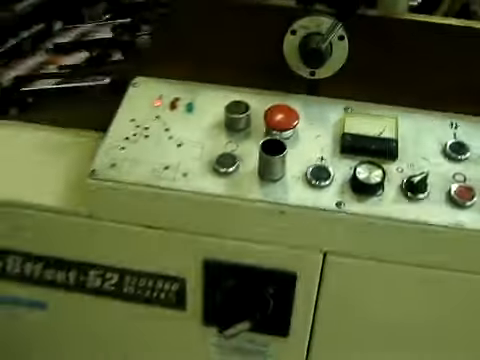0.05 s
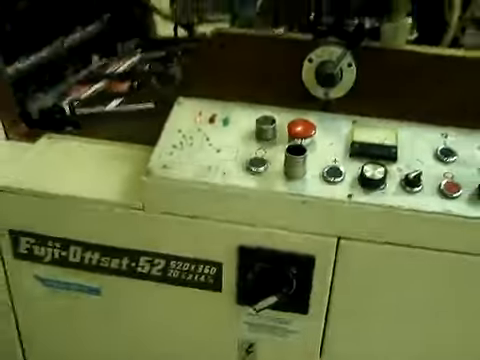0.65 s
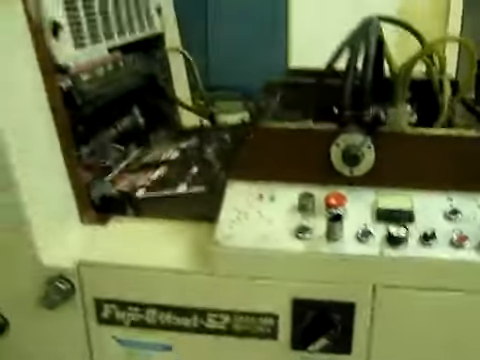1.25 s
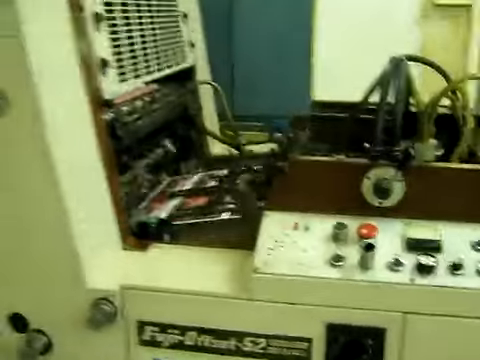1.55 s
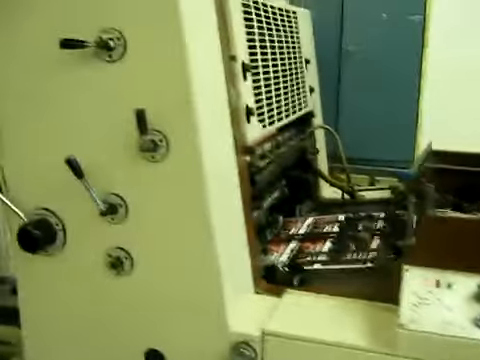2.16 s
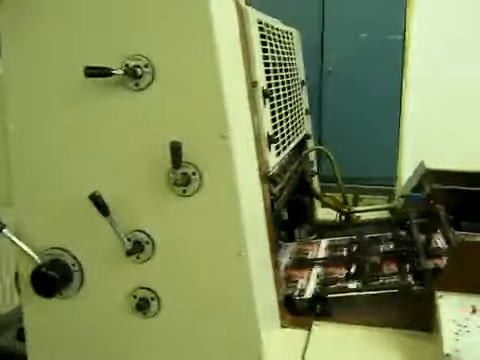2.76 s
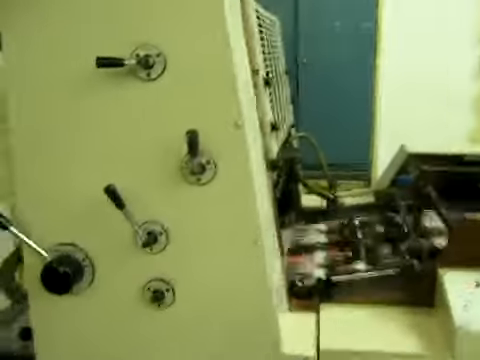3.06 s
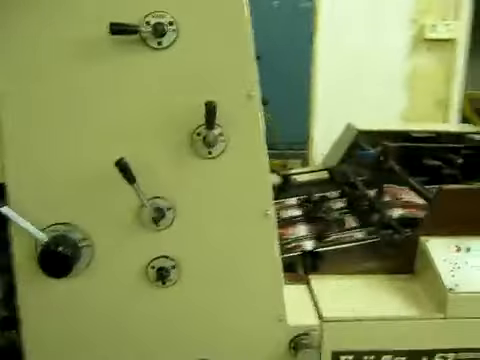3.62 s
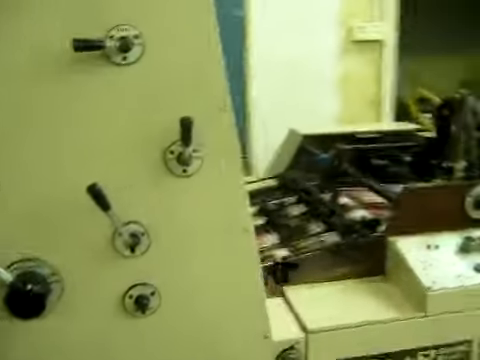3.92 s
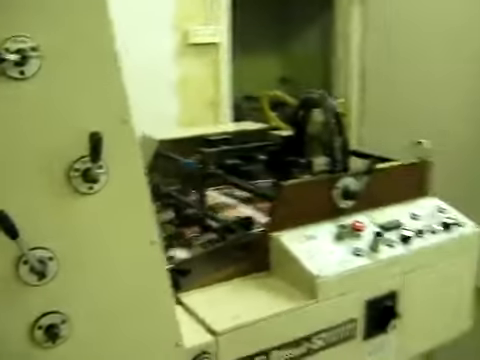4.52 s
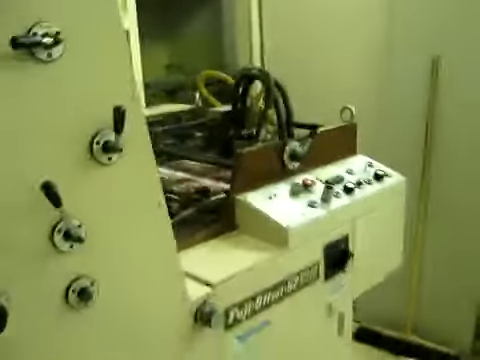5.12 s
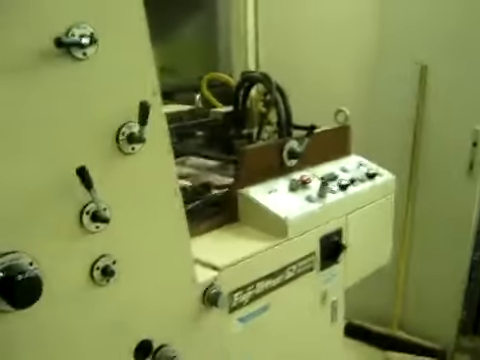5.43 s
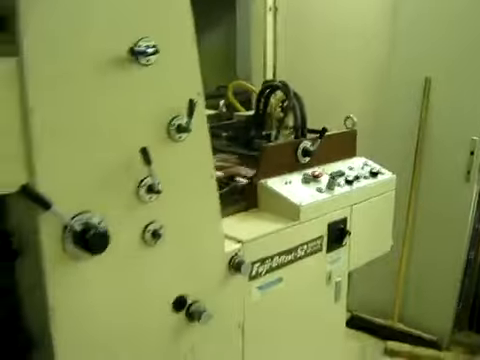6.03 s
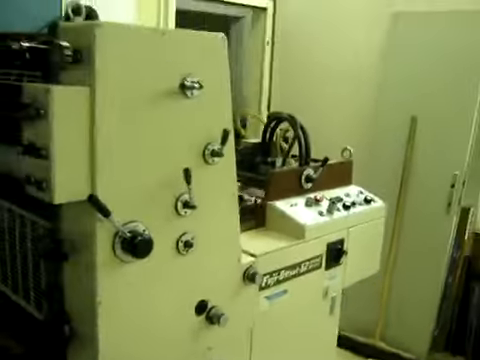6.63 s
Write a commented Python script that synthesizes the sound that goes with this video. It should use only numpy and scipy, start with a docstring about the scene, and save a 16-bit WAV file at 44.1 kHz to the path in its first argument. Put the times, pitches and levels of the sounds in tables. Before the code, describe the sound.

Close to a running printing press, a continuous mechanical roar and hiss carries a quick, even pulse of thumps, air puffs and bright metal clacks. Scattered knocks and dry ticks sound throughout. The handheld microphone rumbles softly in the first half as it moves along the machine, and a gear whine briefly surfaces later. The small room's walls add very short echoes.

```python
"""A small room, where a sheet-fed offset press runs steadily as a microphone is carried along its side.
Gears roar and inked rollers sizzle over motor hum; handling the microphone adds a low rumble.
Each cylinder turn brings a rattling thump, two puffs of feeder air, gripper clicks and the slide of a
sheet. Covers knock, bare metal ticks and the front lay often clacks against its stop. Every third turn
the ink ductor swings over with a low clatter. Close panels and walls add short echoes."""
import sys
import numpy as np
from scipy import signal
from scipy.fft import rfft, irfft, next_fast_len
from scipy.io import wavfile
from scipy.ndimage import map_coordinates

SR = 44100
rng = np.random.default_rng(int(sys.argv[2]) if len(sys.argv) > 2 else 0)


def unload_wav(signal):
    """Save mono or channel-first audio to the path in sys.argv[1] as 16-bit WAV at rate SR, clipped to [-1, 1]."""
    wavfile.write(
        sys.argv[1],
        SR,
        np.round(np.clip(np.atleast_2d(signal).T, -1, 1) * 32767).astype(np.int16),
    )


N = 298998
T = np.arange(N) / SR
TURN_S = .36595
TURN_STARTS_S = np.arange(0, N / SR, TURN_S)


def amp(db):
    """Decibels to gain."""
    return 10 ** (np.asarray(db) / 20)


def unit_rms(x):
    """Scales to unit RMS."""
    return x / np.sqrt(np.mean(x ** 2) + 1e-20)


def curve(rows, column=1):
    """Table column, linearly interpolated in time."""
    rows = np.asarray(rows)
    return np.interp(T, rows[:, 0], rows[:, column])


def coloured(x, spectrum):
    """Filters x by a spectrum table; unit RMS."""
    hz, db = np.transpose(spectrum)
    size = next_fast_len(N)
    bins_hz = np.fft.rfftfreq(size, 1 / SR)
    gain = amp(np.interp(np.log(bins_hz + 1), np.log(hz), db))
    return unit_rms(irfft(rfft(x, size) * gain, size)[:N])


def add(mix, at_s, sound):
    """Mixes a sound in at at_s."""
    part = mix[max(round(at_s * SR), 0):][:len(sound)]
    part += sound[:len(part)]


def drift(per_s):
    """Smooth random wander of about unit size."""
    knots = rng.standard_normal(4096)
    t = T[::64]
    return np.interp(T, t, map_coordinates(knots, [t * per_s], mode="wrap"))


def resonate(x, hz, width_hz):
    """Steep resonance; hz may be a curve."""
    carrier = np.exp(2j * np.pi * np.cumsum(hz * np.ones(len(x))) / SR)
    pole = np.exp(-np.pi * width_hz * 1.5 / SR)
    baseband = signal.lfilter([(1 - pole) ** 2], [1, -2 * pole, pole * pole], x / carrier)
    return unit_rms((carrier * baseband).real)


def rattle(per_s, share):
    """Tiny impacts, smeared by nearby parts, in smooth noise; share is their part of the power."""
    t = np.arange(600) / SR
    scatter = rng.standard_normal((4, len(t))) * amp(-60 * t / .012)
    strikes = rng.uniform(-1, 1, (4, N)) * (rng.random((4, N)) < per_s / 4 / SR)
    spectra = rfft(scatter, 1024, axis=1)
    flat_scatter = irfft(spectra / abs(spectra), axis=1)
    impacts = signal.oaconvolve(strikes, flat_scatter, axes=1).sum(axis=0)[:N]
    return np.sqrt(share) * unit_rms(impacts) + np.sqrt(1 - share) * rng.standard_normal(N)


def each_turn(starts_s, accent_db=0, jitter_s=.001, jitter_db=0.12):
    """Time and accent of each turn's blow, slightly scattered."""
    late, weak = rng.standard_normal((len(starts_s), 2)).T
    return zip(starts_s + jitter_s * late, accent_db - jitter_db * weak)


def stroke(at_s, rise_s, t60_s, hold_s=0, starts_s=TURN_STARTS_S, accent_db=0):
    """Rise, hold and decay envelope, at_s into each given turn."""
    power = np.zeros(N)
    for start_s, turn_db in each_turn(starts_s, accent_db):
        t = T - start_s - at_s
        active = (t > 0) & (t < rise_s + hold_s + t60_s)
        t = t[active]
        decay_db = 60 * np.maximum(t - rise_s - hold_s, 0) / t60_s
        power[active] += (np.minimum(t / rise_s, 1) * amp(turn_db - decay_db)) ** 2
    return np.sqrt(power)


def ring(hz, width_hz, t60_s, rise_s):
    """Struck part: a decaying cluster of close modes."""
    t = np.arange(SR // 2) / SR
    settle = 2048
    modes = resonate(rng.standard_normal(len(t) + settle), hz, width_hz)[settle:]
    return modes * np.minimum(t / rise_s, 1) * amp(-60 * t / t60_s)


def cylinder_gap_db(width_s, gain_db, at_s=.115):
    """Level change as the cylinder gap passes, once a turn."""
    from_gap_s = (T - at_s + TURN_S / 2) % TURN_S - TURN_S / 2
    return gain_db * np.exp(-(from_gap_s / width_s) ** 2)


ROAR, HISS = 1, 2  # columns of WALK and LULLS
# Gain along the walk: (time [s], roar [dB], hiss [dB])
WALK = [(0, 1.5, 1.5), (.75, 1, 1.3), (1.2, 0.5, 2.5), (1.65, 1, 1.8), (2.3, 1.1, 1.7), (3.1, 1, 1.5),
        (3.65, 2, 0.7), (4.2, 2.5, 1.5), (4.75, 1, 2), (5.1, 1.5, 1.5), (5.8, 0.5, 2), (6.78, 1, 1)]


def walk_db(column):
    """Level change as the microphone passes the parts."""
    return curve(WALK, column)


# Brief level changes: (time [s], roar [dB], hiss [dB])
LULLS = [(.12, -1, -1.5), (.275, -0.5, -1), (.335, -1.5, -3), (0.481, -1.5, -4.5), (.69, -1, -2),
         (1.0, -2, -1), (1.19, -3, -4.5), (1.44, -1, -2), (1.795, -0.5, -0.5), (1.941, -0.5, -4),
         (2.68, -1.5, -1), (3.185, -1.5, -1), (3.405, -1, 0), (3.605, -1, -0.5), (3.78, 2, 0),
         (3.835, -2, 0.5), (4.50, -6.5, -1), (4.735, -1, -3.5), (4.88, -4.5, -2.5), (5.241, 0.5, -2.5),
         (5.565, -6, -0.5), (5.612, -3.5, -3.5), (5.75, 1, 0.5), (6.009, -4, 0.5), (6.535, -3.5, -3.5)]


def lulls_db(column, width_s=0.036):
    """Brief dips and a few small lifts."""
    return sum(row[column] * np.exp(-((T - row[0]) / width_s) ** 2) for row in LULLS)


# Gear spectrum: (frequency [Hz], gain [dB])
GEAR_SPECTRUM = [(20, -35), (45, -27), (90, -10.5), (160, -9.5), (195, -3), (320, -5.5), (560, -0.5),
                 (780, -1), (900, -2.5), (1150, -2.5), (1500, -6), (2200, -10.5), (4000, -34.5)]


def gears():
    """Teeth and bearings roar; the deep part repeats every turn."""
    looped_noise = np.resize(rng.standard_normal(round(TURN_S * SR)), N)
    deep = signal.lfilter(*signal.butter(2, 330, fs=SR), looped_noise)
    teeth = rattle(per_s=800, share=0.14) + 0.68 * deep
    gap_db = cylinder_gap_db(width_s=0.031, gain_db=1)
    level_db = -33.5 + walk_db(ROAR) + lulls_db(ROAR) + gap_db + drift(45)
    return coloured(teeth, GEAR_SPECTRUM) * amp(level_db)


# Ink sizzle spectrum: (frequency [Hz], gain [dB])
ROLLER_SPECTRUM = [(500, -17), (1200, -4.5), (1900, 0), (2500, 3), (3400, 1.5), (4400, 2.5), (5000, -1),
                   (5450, -3), (5950, -9.5), (6500, -25), (7000, -15.5)]


def rollers():
    """Tacky ink splits between the rollers; the sizzle eases at the cylinder gap."""
    sizzle = coloured(rattle(per_s=520, share=0.35), ROLLER_SPECTRUM)
    gap_db = cylinder_gap_db(width_s=0.01, gain_db=-1)
    return sizzle * amp(-33 + gap_db + walk_db(HISS) + lulls_db(HISS) + 0.97 * drift(60))


# Shaft and gear-mesh tones: (frequency [Hz], relative level [dB])
MOTOR_TONES = [(98.3, -77), (180.3, -61), (196.6, -56), (222, -62), (246.2, -53.5), (393.8, -55),
               (442.8, -60), (492.3, -54.5), (659.5, -53.5), (738.2, -50), (849.2, -53), (983, -52.5),
               (1039, -52), (1598.8, -55.5)]
# Gear whine, loud where the room favours it: (time [s], level [dB])
WHINE_LEVEL = [(0, -62), (4.88, -60), (5.0, -41.5), (5.3, -42), (5.5, -44.5), (5.62, -56), (6.33, -56),
               (6.48, -47), (6.56, -47), (6.8, -54)]
# Low tones at spots in the room: (time [s], half length [s], frequency [Hz], level [dB])
MOTOR_SWELLS = [(.35, 0.48, 181, -48.5), (1.8, 0.32, 393, -47), (3.953, .13, 197, -48.5),
                (5.33, 0.09, 221, -43), (5.72, .07, 221, -41)]


def motor(whine_hz=740):
    """Shaft and mesh tones waver and fade as the microphone moves through the room."""
    hum = np.zeros(N)
    for hz, db in MOTOR_TONES:
        hum += amp(db - 2 + 2.9 * drift(2.8)) * np.sin(2 * np.pi * hz * T + 0.96 * drift(7.7))
    whine_gain = amp(curve(WHINE_LEVEL) + 1.5 * drift(20))
    whine = whine_gain * np.sin(2 * np.pi * whine_hz * T + .3 * drift(24))
    for at_s, half_s, hz, db in MOTOR_SWELLS:
        swell = amp(db) * np.exp(-((T - at_s) / half_s) ** 2)
        hum += swell * np.sin(2 * np.pi * hz * T + 0.17 * drift(6.5))
    return np.sqrt(2) * (hum + whine)


# Microphone handling rumble: (time [s], level [dB])
RUMBLE_LEVEL = [(0, -68), (1.38, -65), (1.55, -52), (2.0, -59), (2.6, -53.5), (3.05, -55.5), (3.4, -67.5),
                (6.8, -77.5)]
# Rumble spectrum: (frequency [Hz], gain [dB])
RUMBLE_SPECTRUM = [(20, -9.5), (45, -5.5), (70, 1.5), (110, 2.5), (170, -26), (400, -36)]


def handling_rumble():
    """Low rumble of the microphone being handled and carried, swelling from about 1.5 to 3 s."""
    rumble = coloured(rng.standard_normal(N), RUMBLE_SPECTRUM)
    return rumble * amp(curve(RUMBLE_LEVEL) + 6.9 * drift(11))


# Accents per turn: (start [s], thump [dB], feeder blast [dB])
TURN_ACCENTS = [(0, -4.5, -0.5), (.366, -4, -4.5), (.732, -6, -6), (1.098, -4.5, -12), (1.464, -10, -1),
                (1.830, -6, -0.5), (2.196, -2, -3), (2.562, -4, -1), (2.928, -3.5, -2), (3.293, -4.5, 0),
                (3.660, -5, -4), (4.025, -6, -1), (4.391, -6.5, -4), (4.757, -4.5, -5), (5.123, -5, -4),
                (5.489, -5.5, -5), (5.855, -1, -9), (6.219, -3.5, -2.5), (6.587, -8, 0)]
# Thump and swing arm spectra: (frequency [Hz], gain [dB])
THUMP_SPECTRUM = [(60, -21.5), (130, -24.5), (230, -3), (370, 3), (560, 3), (850, -1), (1200, 2),
                  (1650, -1), (2300, -3), (3500, -5.5), (4800, -11), (6400, -27)]
ARM_SPECTRUM = [(60, -19.5), (220, 3), (560, 6), (1200, 5), (1700, -5.5), (4200, 4), (5400, -2.5),
                (6600, -15)]


def cylinders():
    """The cylinder gap thumps through the frame; the swing arm clatters back."""
    starts_s, thump_db, _ = np.transpose(TURN_ACCENTS)
    thump = amp(-25) * coloured(rattle(per_s=1000, share=0.47), THUMP_SPECTRUM)
    thump *= stroke(at_s=-0.06, rise_s=0.048, t60_s=0.25, hold_s=0.021,
                    starts_s=starts_s, accent_db=thump_db)
    arm = amp(-32.5 + walk_db(ROAR)) * coloured(rattle(per_s=860, share=0.41), ARM_SPECTRUM)
    arm *= stroke(at_s=0.185, rise_s=0.041, t60_s=0.12)
    return (thump + arm) * amp(lulls_db(ROAR))


# Sucker, blower and sheet spectra: (frequency [Hz], gain [dB])
SUCKER_SPECTRUM = [(200, -15), (800, -2.5), (1200, 0), (2300, -5.5), (3000, -2.5), (4200, 0), (4800, 1.5),
                   (5400, -3), (5950, -8), (6800, -30.5)]
BLOWER_SPECTRUM = [(1000, -30), (2300, -11.5), (3000, -1.5), (3600, 1.5), (4200, -0.5), (4800, 1.5),
                   (5400, -3), (5950, -8), (6800, -26.5)]
SHEET_SPECTRUM = [(200, -19.5), (900, -20.5), (2300, -13), (3000, 4), (3600, 8), (4800, 6.5), (5400, 6),
                  (5950, -6), (6800, -32.5)]
# Air jet resonance along the walk: (time [s], frequency [Hz], level before accents [dB])
JET_RESONANCE = [(0, 5500, -59), (1.3, 5050, -46), (2.2, 4440, -41.5), (3.1, 3780, -42), (5.3, 4250, -41),
                 (6.8, 4430, -46)]


def feeder():
    """Suckers vent, the blower lifts a sheet with a ringing jet, the sheet slides down the board."""
    sucker = amp(-31) * coloured(rattle(per_s=890, share=0.21), SUCKER_SPECTRUM)
    sucker *= stroke(at_s=0.0022, rise_s=0.042, t60_s=0.64)
    blower = amp(-28.5) * coloured(rattle(per_s=1900, share=0.2), BLOWER_SPECTRUM)
    jet = resonate(rng.standard_normal(N), curve(JET_RESONANCE), width_hz=420)
    jet *= amp(curve(JET_RESONANCE, column=2))
    starts_s, _, blast_db = np.transpose(TURN_ACCENTS)
    blast = stroke(at_s=0.1498, rise_s=0.0084, t60_s=0.46, starts_s=starts_s, accent_db=blast_db)
    sheet = amp(-36.5 + walk_db(HISS)) * coloured(rattle(per_s=990, share=0.93), SHEET_SPECTRUM)
    sheet *= stroke(at_s=0.223, rise_s=0.017, t60_s=0.53)
    return (sucker + (blower + jet) * blast + sheet) * amp(lulls_db(HISS))


# Frame and cover knocks: (time [s], frequency [Hz], t60 [s], level [dB])
KNOCKS = [(0.014, 230, 0.23, -35), (.36, 397, 0.23, -24.5), (0.734, 228, 0.24, -36), (.748, 754, 0.18, -34),
          (1.462, 850, 0.24, -28.5), (1.585, 483, 0.12, -27), (1.818, 1006, 0.14, -26),
          (1.925, 604, .22, -29), (2.135, 700, 0.16, -24), (2.185, 892, .21, -27), (2.545, 898, 0.23, -29),
          (2.915, 564, 0.24, -27), (3.033, 392, 0.18, -33), (3.283, 855, 0.12, -22),
          (3.428, 300, 0.11, -27.5), (3.656, 840, 0.22, -28), (3.868, 350, 0.23, -25.5),
          (4.017, 710, 0.2, -31), (4.222, 804, .14, -26), (4.404, 344, 0.13, -22),
          (5.315, 690, 0.27, -32.5), (5.462, 806, 0.26, -25.5), (5.829, 1000, .25, -26),
          (5.845, 400, 0.22, -24.5), (6.176, 1070, 0.26, -35)]


def knocks():
    """The frame or a loose cover knocks; panels radiate little deep bass."""
    out = np.zeros(N)
    for at_s, hz, t60_s, db in KNOCKS:
        add(out, at_s, amp(db) * ring(hz, 0.78 * hz, t60_s, rise_s=0.015))
    return signal.sosfilt(signal.butter(4, 175, "highpass", fs=SR, output="sos"), out)


def click(hz, width_hz, t60_s):
    """Small stiff parts ring with one mode, wide ones with a cluster."""
    t = np.arange(SR // 2) / SR
    mode = np.sqrt(2) * np.sin(2 * np.pi * hz * t) * np.minimum(t / 0.0045, 1) * amp(-60 * t / t60_s)
    cluster = ring(hz, width_hz, t60_s, rise_s=0.0028)
    purity = np.exp(-width_hz / 450)
    return np.sqrt(purity) * mode + np.sqrt(1 - purity) * cluster


# Strikes in every turn: (time in turn [s], frequency [Hz], width [Hz], t60 [s], relative level [dB])
TURN_CLICKS = [(.061, 3100, 650, 0.035, -28), (0.064, 3600, 1480, 0.03, -28.5),
               (.062, 1070, 350, .025, -41), (.074, 4030, 260, 0.033, -29.5),
               (0.095, 5010, 1210, .03, -36.5), (.141, 2345, 1114, 0.028, -26.5),
               (0.14, 1390, 304, 0.028, -28), (0.147, 4420, 1450, 0.014, -29), (0.16, 5270, 700, .04, -42),
               (0.162, 4200, 448, 0.18, -38.5), (0.296, 1930, 890, 0.048, -31.5),
               (0.297, 4270, 1600, 0.025, -29), (0.349, 1270, 264, 0.016, -33.5)]
# Harder gripper snaps: (time [s], frequency [Hz], width [Hz], t60 [s], level [dB])
GRIPPER_SNAPS = [(.209, 1995, 500, 0.057, -26), (.531, 3550, 900, .09, -27), (.875, 2400, 800, 0.054, -30),
                 (1.272, 4550, 402, 0.071, -29), (1.525, 2980, 40, 0.064, -30),
                 (1.619, 2840, 900, .11, -29), (1.892, 3100, 120, 0.049, -21), (2.257, 2850, 150, .06, -27),
                 (2.266, 3840, 450, .055, -24), (2.335, 2180, 100, 0.057, -28),
                 (2.626, 3100, 300, 0.063, -31), (3.091, 4130, 300, .1, -30), (3.437, 3200, 200, .07, -26),
                 (3.808, 2450, 900, 0.076, -28.5), (4.191, 3950, 600, 0.15, -29),
                 (4.453, 3320, 500, .08, -29), (4.561, 3790, 300, .07, -31), (4.817, 3240, 900, .08, -29),
                 (4.920, 4200, 450, .17, -35), (5.268, 3000, 1300, 0.1, -27),
                 (5.283, 4230, 350, 0.15, -29.5), (5.532, 1620, 1300, 0.2, -29),
                 (5.902, 4520, 350, .08, -24.5), (6.21, 2340, 500, .14, -33),
                 (6.384, 4240, 300, 0.12, -27.5), (6.741, 3820, 150, 0.064, -30)]


def grippers(start_db=2, fade_db_per_s=0.5):
    """Grippers, lays and cam followers click, fading as the feeder recedes; some snaps clink harder."""
    out = np.zeros(N)
    for at_s, hz, width_hz, t60_s, db in TURN_CLICKS:
        for start_s, turn_db in each_turn(TURN_STARTS_S):
            gain = amp(db + turn_db + start_db - fade_db_per_s * start_s)
            add(out, start_s + at_s, gain * click(hz, width_hz, t60_s))
    for at_s, hz, width_hz, t60_s, db in GRIPPER_SNAPS:
        add(out, at_s, amp(db) * click(hz, width_hz, t60_s))
    return out


# Dry ticks near the feeder: (time [s], level [dB])
TICKS = [(0.065, -25), (.298, -23), (.429, -22.5), (.508, -25), (.661, -30), (1.162, -35), (1.754, -24),
         (1.868, -29), (1.894, -24), (2.570, -31), (2.915, -27), (3.277, -34), (4.680, -24), (5.017, -30),
         (5.949, -22), (6.319, -32)]
# Tick spectrum: (frequency [Hz], gain [dB])
TICK_SPECTRUM = [(500, -3), (1500, -0.5), (2700, 11.5), (4000, 9.5), (5600, 3), (6600, -25.5)]


def ticks(t60_s=0.042):
    """Bare metal meets metal: instant attack, almost no ring."""
    t = np.arange(SR // 4) / SR
    envelope = np.zeros(N)
    for at_s, db in TICKS:
        add(envelope, at_s, amp(db - 60 * t / t60_s))
    return envelope * coloured(rng.standard_normal(N), TICK_SPECTRUM)


# Front lay clacks: (time [s], level [dB])
LAY_CLACKS = [(.162, -28), (.526, -26), (.893, -26), (1.256, -24), (1.626, -29.5), (1.992, -34),
              (2.36, -29), (2.728, -32), (3.088, -30), (3.814, -30), (4.182, -31), (4.797, -41),
              (5.278, -26), (5.528, -25.5), (5.905, -31), (6.381, -28)]
# Clack spectrum: (frequency [Hz], gain [dB])
CLACK_SPECTRUM = [(800, -13), (2400, -16), (3300, 0.5), (4200, -0.5), (5100, 3.5), (5600, 0.5), (6100, -12),
                  (6700, -28.5)]


def front_lay(t60_s=0.05, bounce_s=0.0048, bounce_db=-8.5):
    """The front lay snaps against its stop and bounces once: a bright clack."""
    t = np.arange(SR // 4) / SR
    power = np.zeros(N)
    for at_s, db in LAY_CLACKS:
        blow = amp(db - 60 * t / t60_s)
        add(power, at_s, blow ** 2)
        add(power, at_s + bounce_s, (amp(bounce_db) * blow) ** 2)
    return np.sqrt(power) * coloured(rng.standard_normal(N), CLACK_SPECTRUM)


# Ductor clatter spectrum: (frequency [Hz], gain [dB])
DUCTOR_SPECTRUM = [(60, -16), (200, 7), (350, 3), (600, -6.5), (1200, -4), (2200, -19), (4500, -3),
                   (6500, -27)]


def ductor():
    """Every third turn the ductor roller meets the ink train and spins up with a clatter."""
    clatter = amp(-32.5) * coloured(rattle(per_s=700, share=0.53), DUCTOR_SPECTRUM)
    return clatter * stroke(at_s=0.064, rise_s=0.077, t60_s=0.12, starts_s=TURN_STARTS_S[2::3])


def walls(x, extra_paths_m=(.9, 1.4, 2.1, 2.9, 3.7), sway_m=0.125, echo_db=-20):
    """Adds treble echoes off panels and walls; the paths sway as the microphone moves."""
    sound_m_per_s = 343
    treble = signal.sosfilt(signal.butter(2, 600, "highpass", fs=SR, output="sos"), x)
    delays_s = [(path_m + sway_m * drift(1.1)) / sound_m_per_s for path_m in extra_paths_m]
    echoes = sum(np.interp(T - delay_s, T, treble, left=0) for delay_s in delays_s)
    return x + amp(echo_db) * echoes


def room_tail(x, t60_s=0.052, taps_per_s=2000):
    """Close walls return a short, dense tail."""
    t = np.arange(SR // 2) / SR
    taps = rng.choice([-1., 1.], len(t)) * (rng.random(len(t)) < taps_per_s / SR) * (t > .004)
    tail = taps * amp(-60 * t / t60_s)
    return signal.fftconvolve(x, tail / np.linalg.norm(tail))[:N]


def scene():
    """The press, its reflections and the handling rumble, alike in both channels."""
    hits = grippers() + front_lay() + ticks() + knocks()
    running = gears() + rollers() + cylinders() + ductor() + feeder()
    mix = motor() + handling_rumble() + walls(running) + hits + amp(-5) * room_tail(hits)
    return np.array([mix, mix])


def record(dry):
    """Narrow-band microphone; its converter rests slightly below zero."""
    cutoff_hz, dc_offset = 6650, -.008
    low_pass = signal.firwin(221, cutoff_hz, window=("kaiser", 8), fs=SR)
    return signal.oaconvolve(dry, low_pass[None], "same") + dc_offset


dry = scene()
out = record(dry)
unload_wav(out)
```